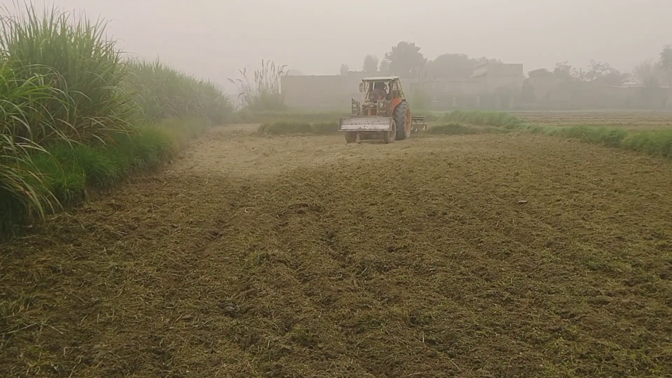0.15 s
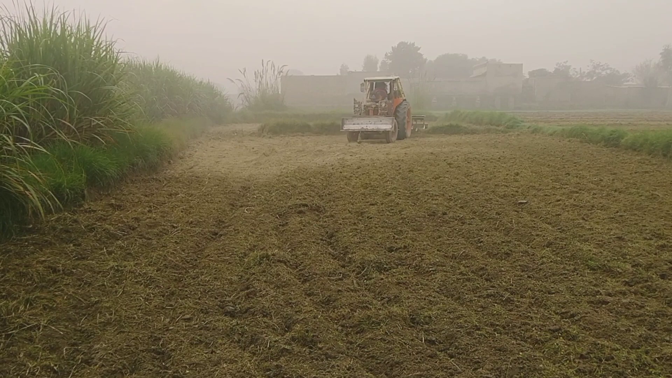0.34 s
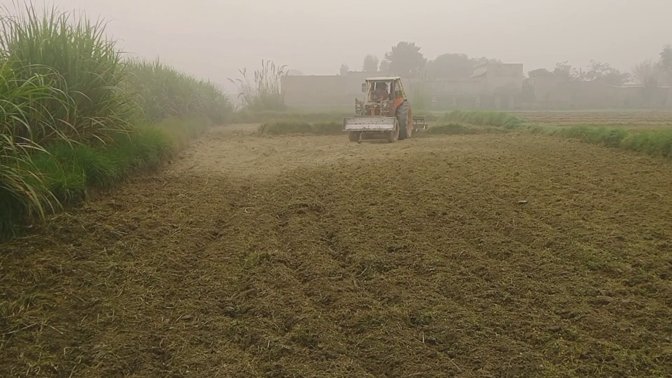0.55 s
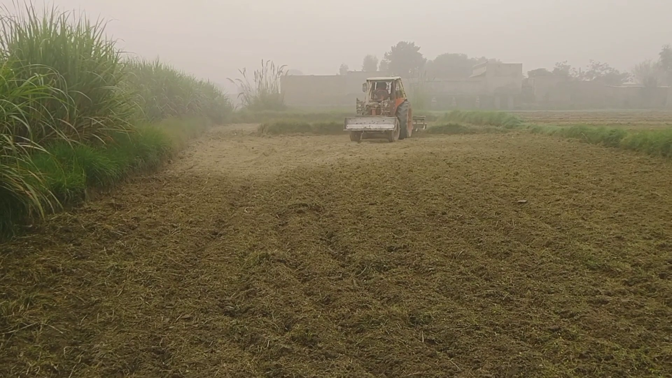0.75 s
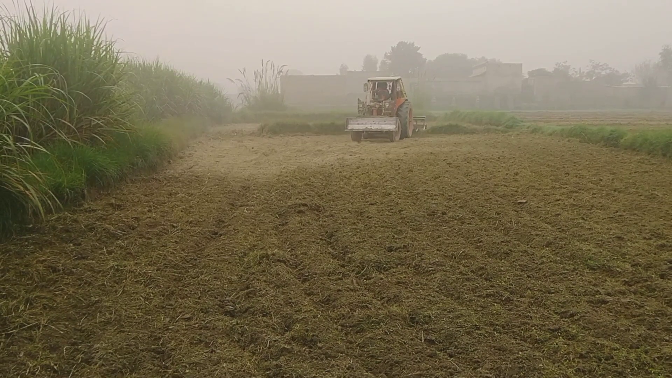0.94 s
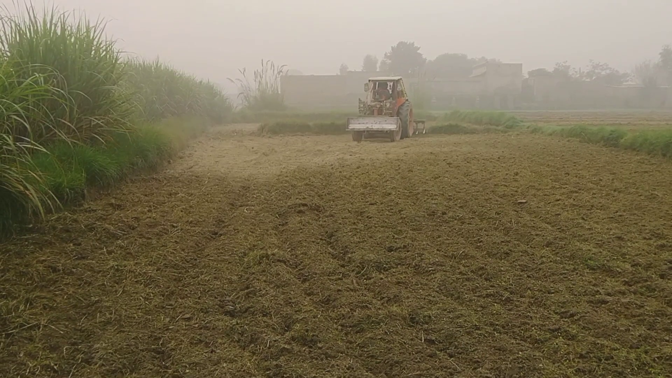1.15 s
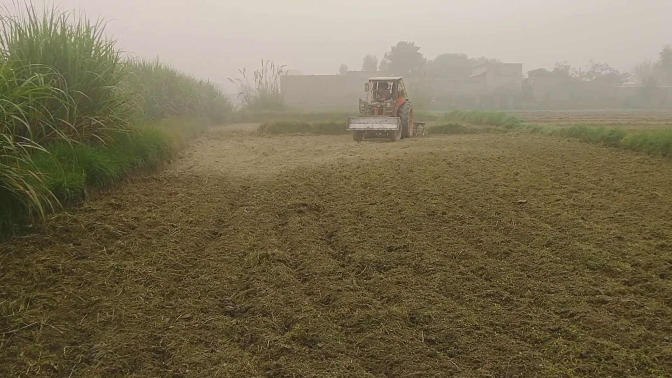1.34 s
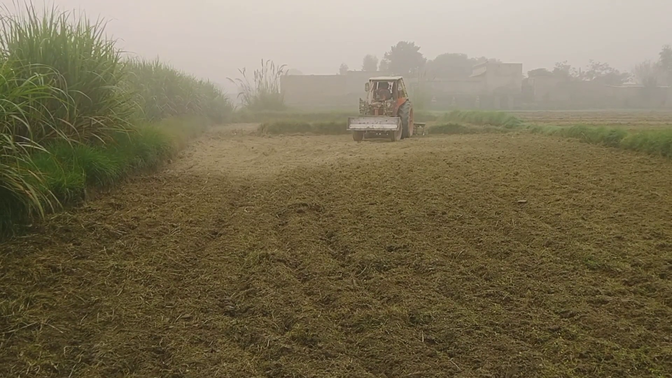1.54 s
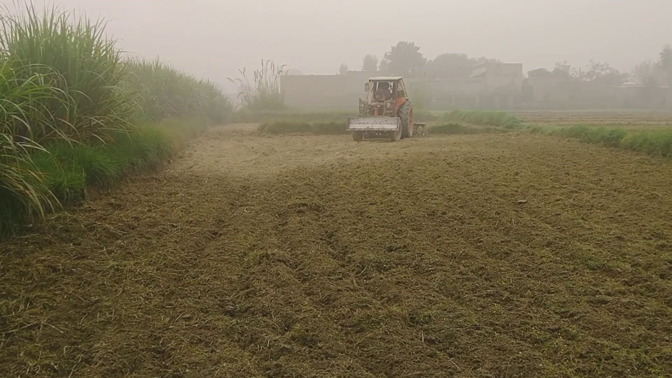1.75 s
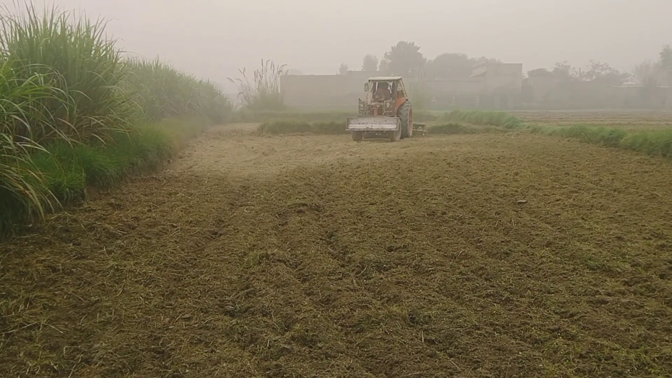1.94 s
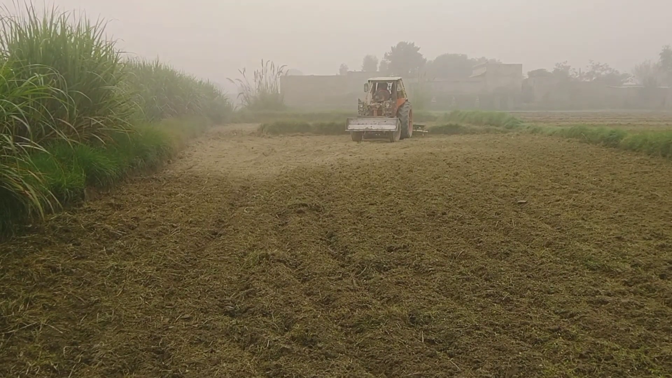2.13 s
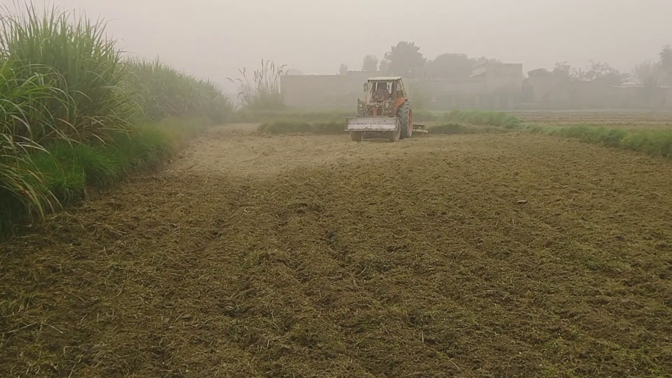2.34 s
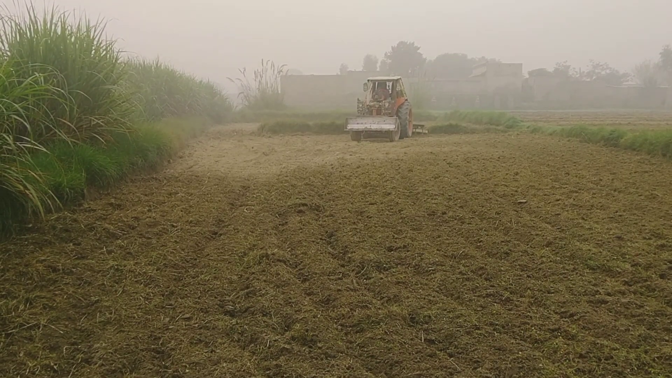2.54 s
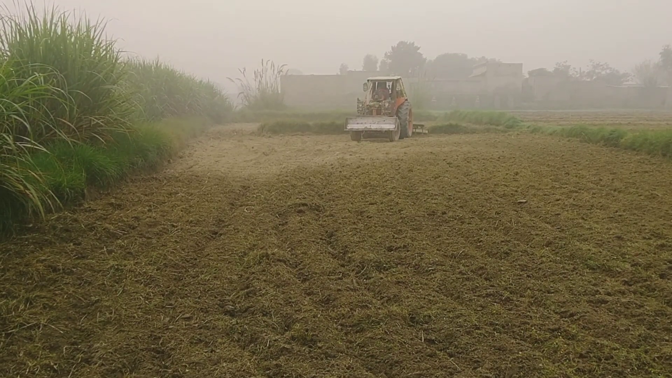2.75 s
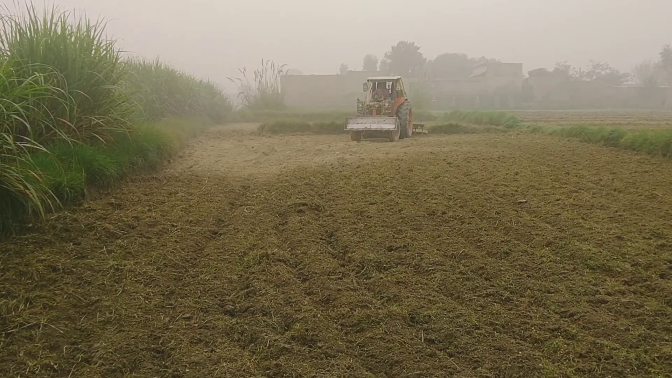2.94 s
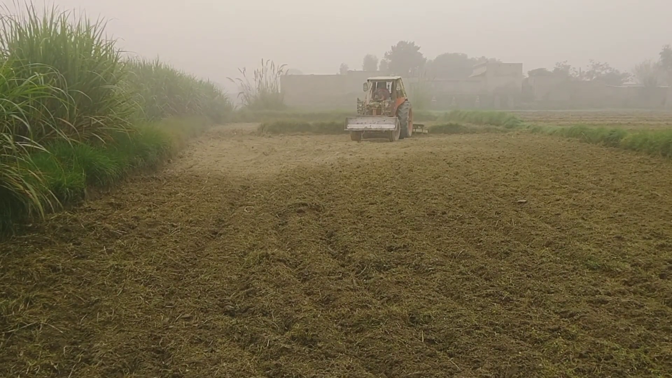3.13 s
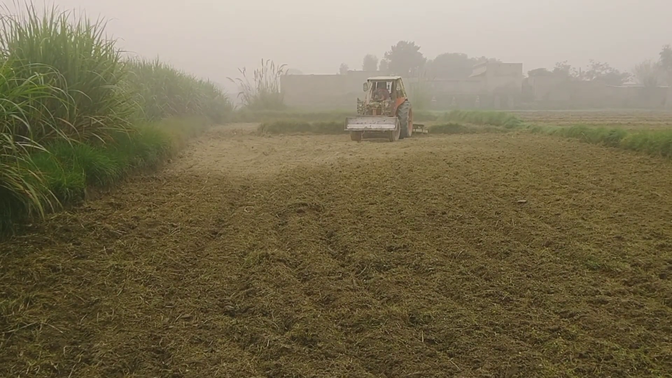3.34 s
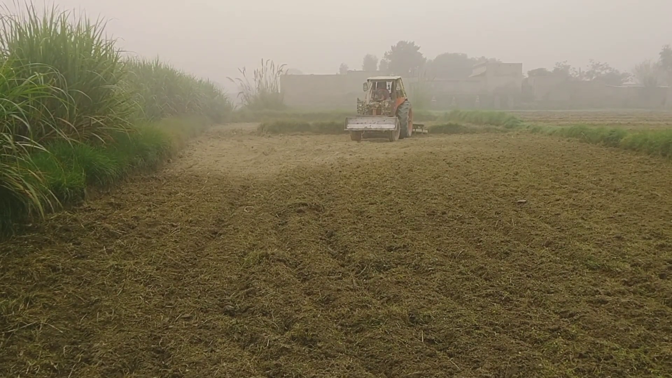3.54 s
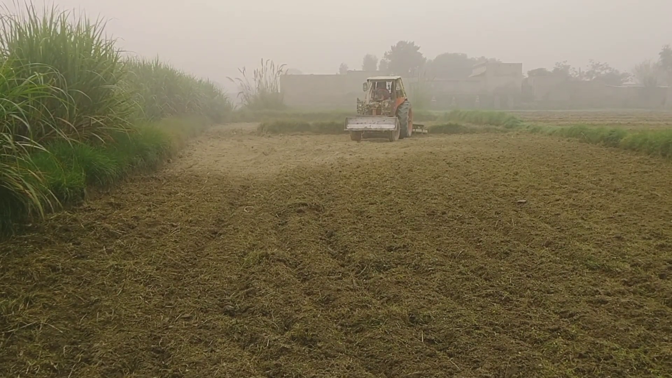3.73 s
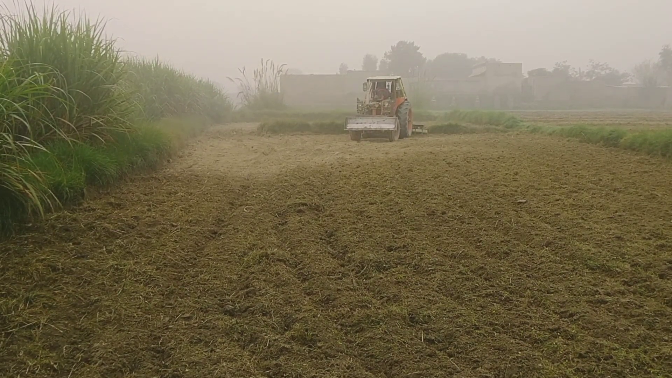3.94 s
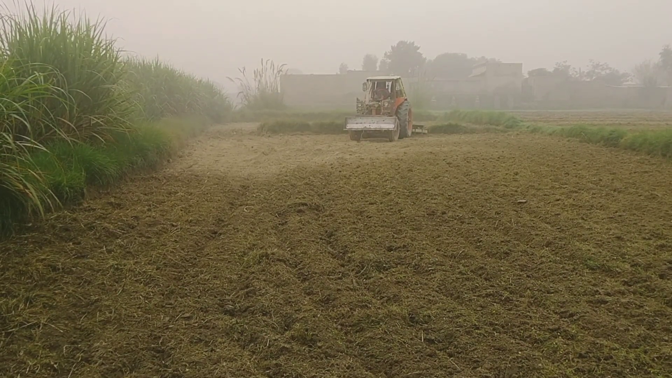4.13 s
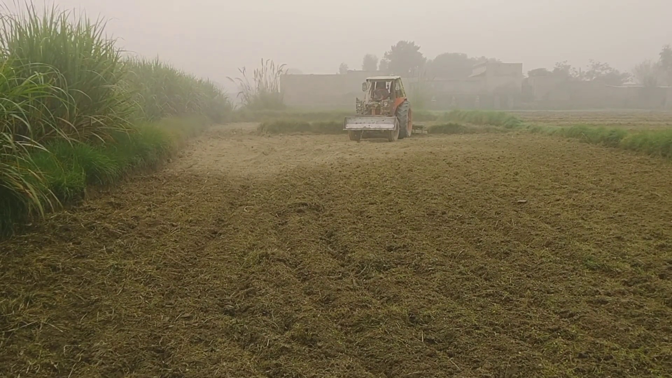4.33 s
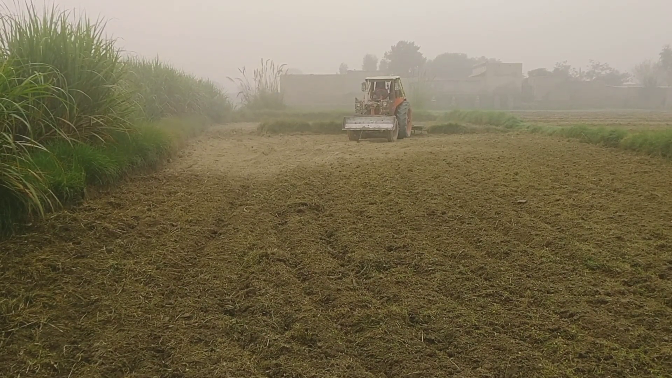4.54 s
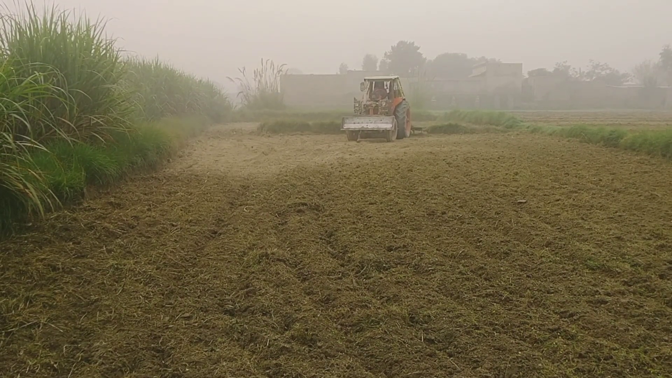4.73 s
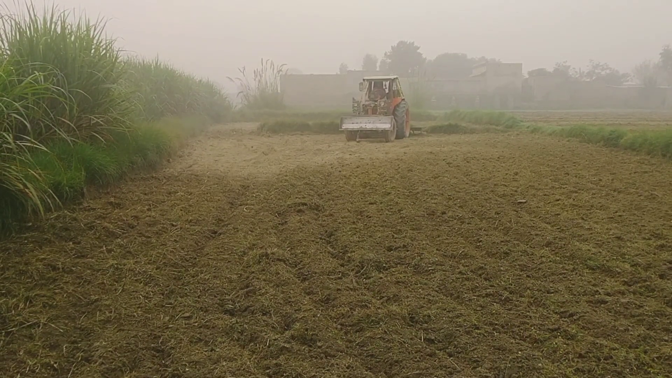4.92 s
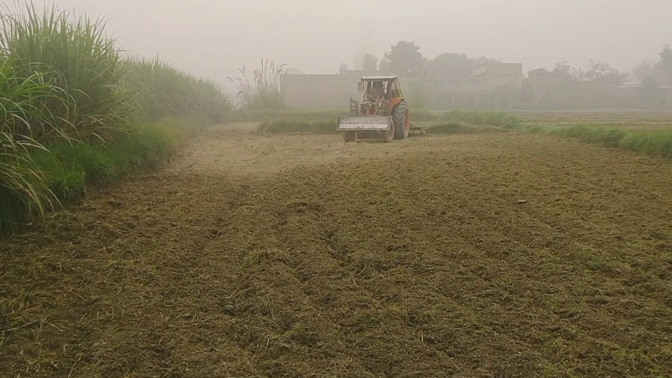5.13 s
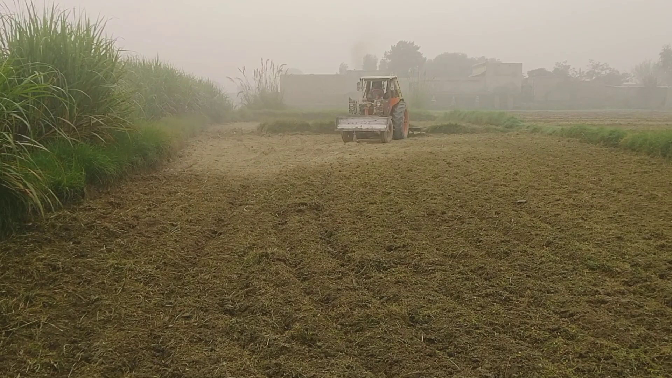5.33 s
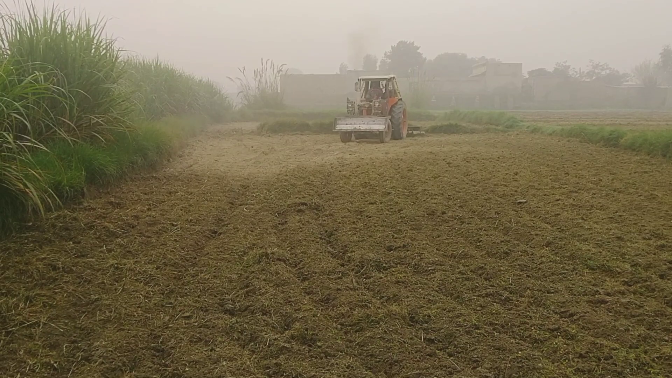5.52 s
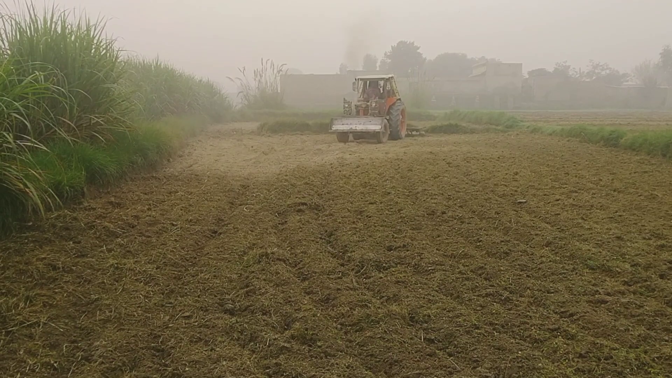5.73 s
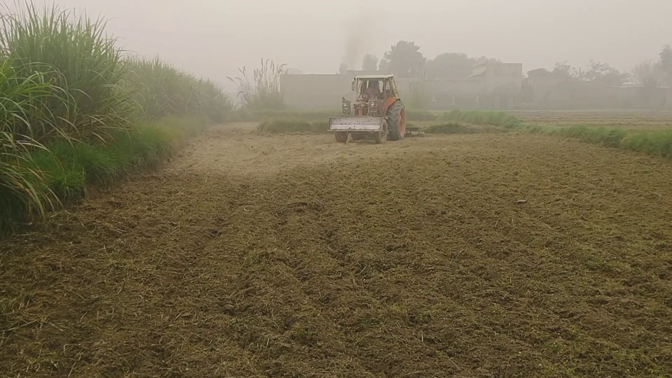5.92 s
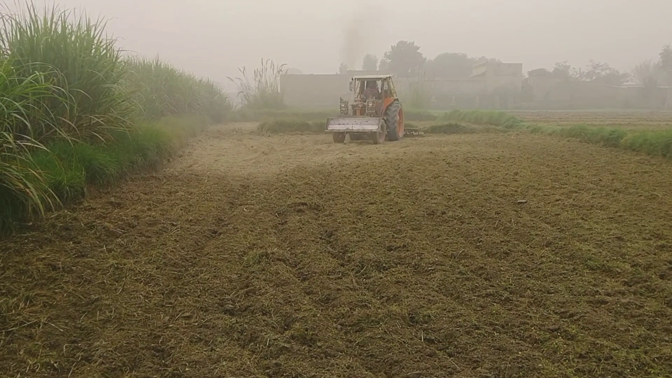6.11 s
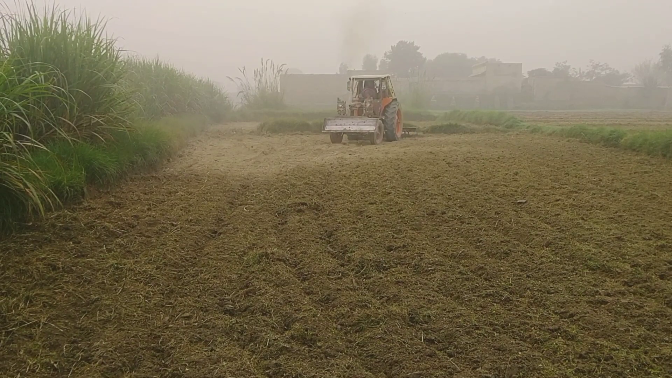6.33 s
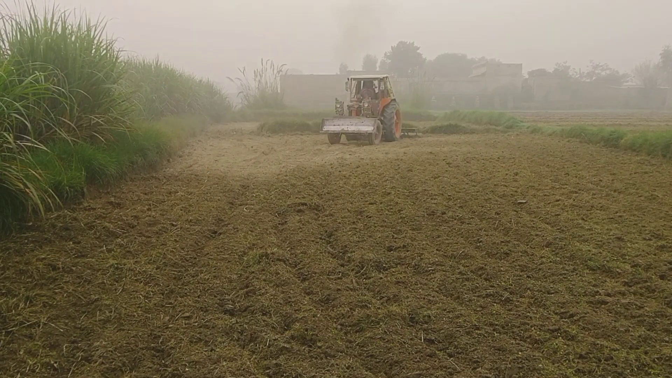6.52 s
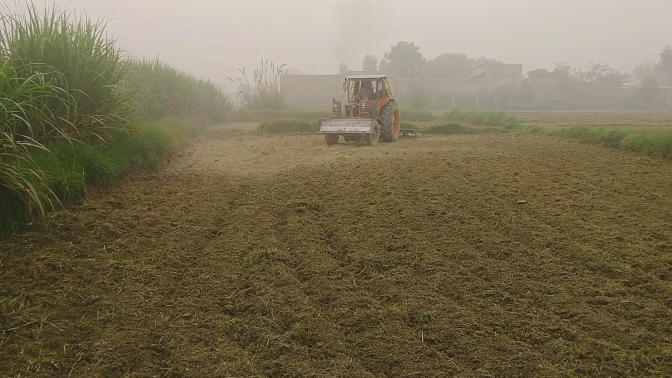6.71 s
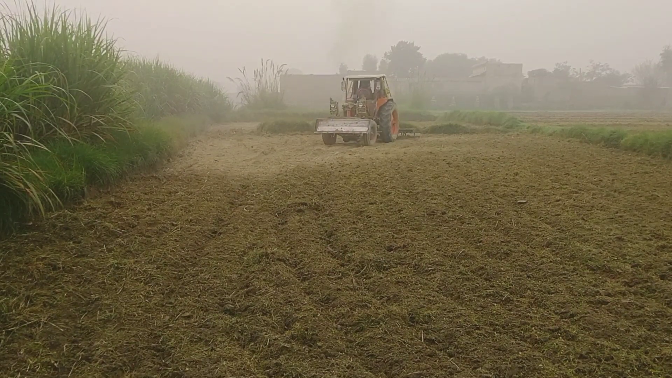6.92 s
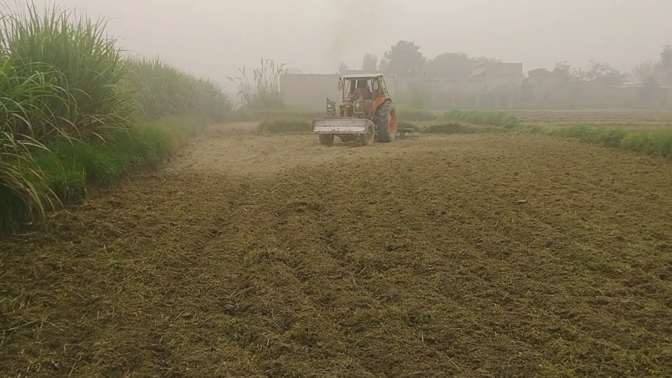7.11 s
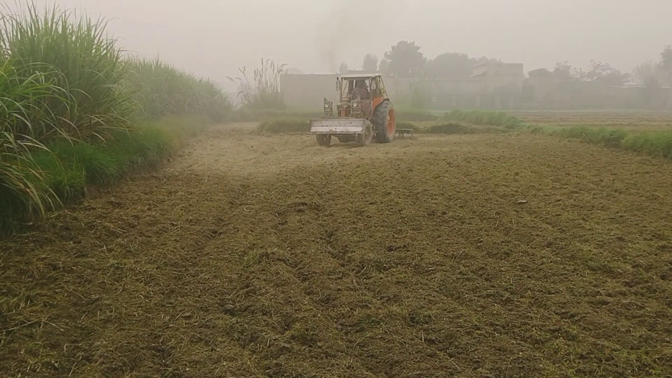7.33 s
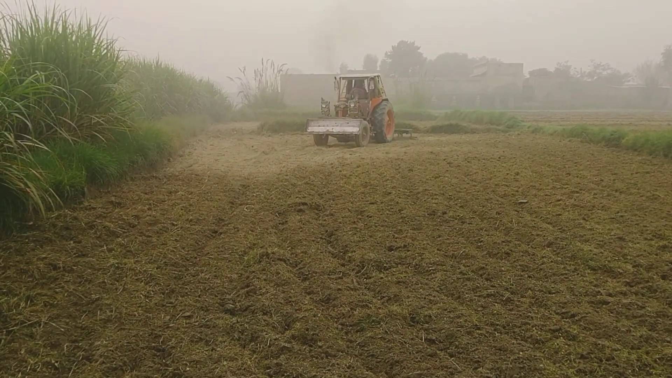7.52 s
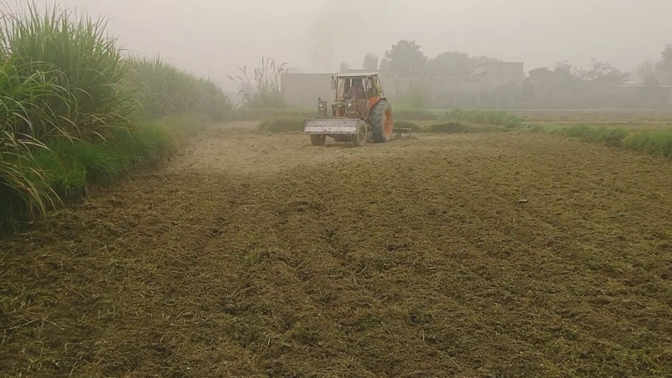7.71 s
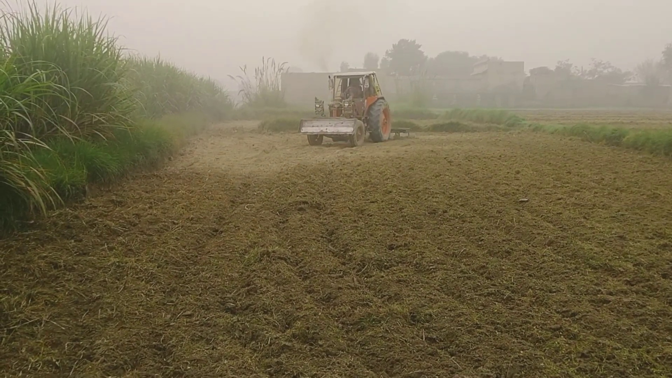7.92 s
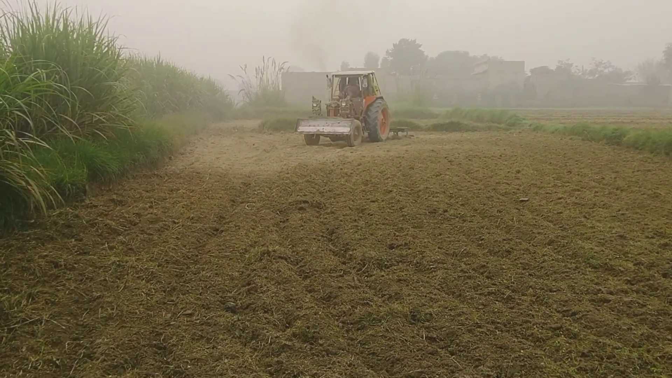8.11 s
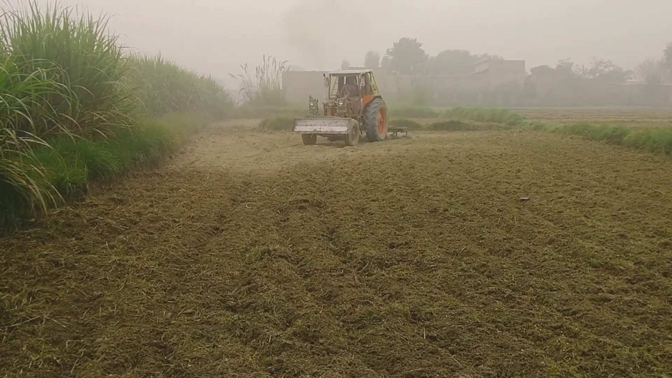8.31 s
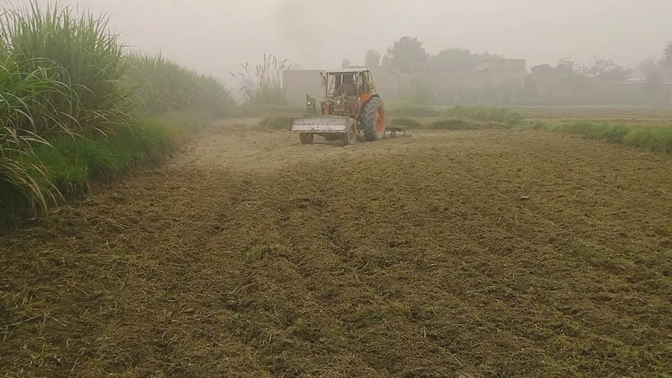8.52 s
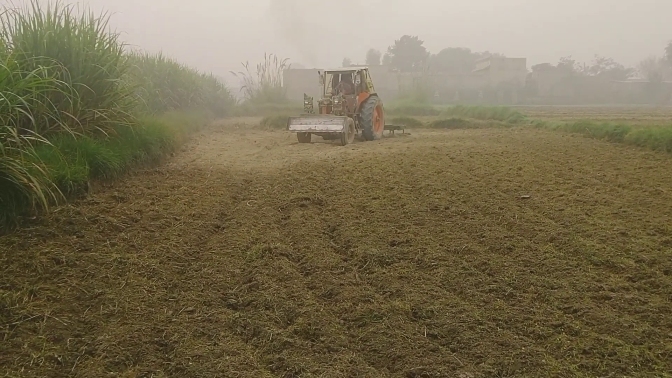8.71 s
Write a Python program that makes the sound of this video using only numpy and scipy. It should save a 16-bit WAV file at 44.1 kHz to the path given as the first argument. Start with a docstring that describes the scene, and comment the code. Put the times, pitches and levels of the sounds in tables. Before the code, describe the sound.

A tractor's diesel engine slows to a soft, lumpy idle, then speeds up into a loud, rapid clatter with puffing exhaust.

```python
"""A four-cylinder diesel tractor idles across a field, heard with little bass and no high treble.
Each firing knocks the engine block and puffs down the exhaust pipe, over a whirr and a faint hum;
the first two cylinders to fire hit hardest. By 2 s the engine has slowed and the hum is fading.
At 3.7 s it takes load and grows much louder, then revs up to about 1200 turns a minute and pulls away."""
import sys
import numpy as np
from scipy import signal
from scipy.fft import rfft, irfft, next_fast_len
from scipy.io import wavfile
from scipy.ndimage import uniform_filter1d

SR = 44100
rng = np.random.default_rng(int(sys.argv[2]) if len(sys.argv) > 2 else 0)


def waveform_to_disk(signal):
    """Save audio, clipped to [-1, 1], as 16-bit WAV at the path in sys.argv[1]."""
    frames = np.transpose(np.atleast_2d(signal))
    scaled = np.clip(frames, -1, 1) * 32767
    samples = np.round(scaled).astype(np.int16)
    wavfile.write(sys.argv[1], SR, samples)


N = 386316
CYLINDERS, FIRING_SAMPLES = 4, 4096


def amp(db):
    """Turns decibels into a gain."""
    return 10 ** (np.asarray(db) / 20)


def unit(x):
    """Scales each row to an average power of 1."""
    return x / np.sqrt(np.mean(np.abs(x) ** 2, axis=-1, keepdims=True) + 1e-30)


def along(points, hz):
    """Reads a table of frequencies and levels on a log axis."""
    f, db = np.transpose(points)
    return np.interp(np.log(hz + 1), np.log(f + 1), db)


def curves(rows, at):
    """Reads each column after the time at the given seconds."""
    times, *columns = np.transpose(rows)
    return [np.interp(at, times, column) for column in columns]


def coloured(x, points):
    """Shapes the tone with a filter that rings only after each sound, never before."""
    m = next_fast_len(N + SR) // 2 * 2
    cepstrum = irfft(np.log(amp(along(points, np.fft.rfftfreq(m, 1 / SR))) + 1e-6), m)
    cepstrum[1:m // 2] *= 2
    cepstrum[m // 2 + 1:] = 0
    return irfft(rfft(x, m) * np.exp(rfft(cepstrum)), m)[:N]


def resonance(hz, centre, width):
    """One ringing tone: a band filter applied three times for steep sides."""
    return (1j * hz * width / (centre ** 2 - hz ** 2 + 1j * hz * width)) ** 3


# how hard the engine works: t/s, share of full load/0-1
LOAD = [(3.7, 0), (4.15, 1)]

def load_at(times):
    """Gives 0 at idle and 1 at full load."""
    return curves(LOAD, times)[0]


# crank speed: t/s, speed/turns per minute
CRANK_SPEED = [(-0.07, 813.7), (0.3, 788.6), (0.6, 685.0), (1.9, 518.1), (3.15, 587.2), (3.45, 575.3),
               (3.8, 577.3), (3.9, 688.9), (4.4, 842.9), (4.9, 822.4), (5.3, 960.4), (5.55, 962.9),
               (6.05, 1107.6), (6.3, 1057.4), (6.8, 1121.4), (6.9, 1041.0), (7.05, 1103.2), (7.2, 1051.3),
               (7.55, 1203.4), (7.8, 1163.5), (8.2, 1216.3), (8.77, 1211.9)]
# how late each cylinder gets its fuel: delay/firing intervals
FUEL_DELAY = [0.00385, -.01, .02, .02]

def firings():
    """Each cylinder fires once in two turns of the crank; gives the times and cylinders (0-3)."""
    at = np.arange(CRANK_SPEED[0][0], CRANK_SPEED[-1][0], 1 / SR)
    cycles = np.cumsum(curves(CRANK_SPEED, at)[0]) / (60 * 2 * SR)
    count = np.arange(int(cycles[-1] * CYLINDERS))
    cylinder = count % CYLINDERS
    due = (count + np.array(FUEL_DELAY)[cylinder]) / CYLINDERS
    return np.interp(due, cycles, at), cylinder


def burn(cylinder, load, lead):
    """Burning fuel makes a rough burst of pressure, starting after `lead` samples."""
    t = np.maximum(np.arange(FIRING_SAMPLES) - lead, 0) / SR
    rise_s = np.where(cylinder < 2, .004, .008 - .0045 * load)[:, None]  # weak idle firings burn slowly
    fade_s = (.055 - .029 * load)[:, None]
    shape = (1 - np.exp(-(t / rise_s) ** 2)) * (amp(-60 * t / fade_s) + .081 * amp(-60 * t / .13))
    return shape * rng.standard_normal(shape.shape)


# ringing tones of block and bonnet: idle f/Hz, loaded f/Hz, width/Hz
BLOCK_TONES = [(373, 402, 131), (638, 630, 226), (829, 937, 187), (1260, 1310, 250), (1566, 1727, 460),
               (1880, 2060, 270), (2418, 2356, 440), (2864, 3165, 560), (3550, 3587, 536),
               (4190, 4050, 320), (4820, 4700, 780), (5510, 5580, 800), (6580, 6370, 750)]
# how hard each tone is struck: cylinder 1 level/dB, 2 level/dB, 3 and 4 level/dB, load change/dB
STRIKES = [(-21, -13, -10, -1), (-26, -19.5, -17, 8), (6.5, -6, 4.5, -6.5), (-8, -13, -5.5, -10.5),
           (-5.5, -5, 7, -4.5), (-3.5, -10, 0, 5), (3, -1.5, 2, 0), (1, -9, -4, 1), (3, -6.5, -6, 6),
           (-27, -19, -9, -6.5), (-34.5, -20.5, -19.5, -4.5), (-14.5, -8, -7, -4.5),
           (-27.5, -18, -17, -0.5)]
# cylinders 3 and 4 favour two tones under load; for each tone: boost/dB
PING = [-1, 1.5, -0.5, -1, -5, -4, 3.5, -2.5, 4, 0.5, -1, -0.5, 1]
# the knock: t/s, cylinder 1 level/dB, 2 level/dB, 3 and 4 level/dB,
# boost of 1's bright rap/dB, boost of 1 and 2's low thud under load/dB
KNOCK_LEVELS = [(0, -45.5, -47.5, -60, -9, 0), (.5, -54, -51.5, -61, -17, 0),
                (1.7, -50.5, -56, -57, -6.5, 0), (2.1, -47.5, -46.5, -58.5, -7.5, 0),
                (2.7, -43, -44.5, -56.5, -12.5, 0), (3.05, -40.5, -39.5, -59, -12, 0),
                (3.25, -52, -52, -58, -17, 0), (3.66, -43, -45, -57.5, -9, 3),
                (3.84, -28.5, -27.5, -53, -11, -7), (4.5, -22.5, -26, -41, -4.5, -1),
                (5, -17.5, -23, -30.5, -5, -1), (5.4, -21, -25.5, -28, -2, 2), (5.8, -23, -26, -30.5, 4, 4),
                (6, -28, -32, -39.5, -2.5, 8), (6.6, -23.5, -27, -37.5, 2, 1),
                (7, -24, -33, -37.5, -2.5, 6), (7.3, -20, -25.5, -31.5, 5.5, 5.5),
                (7.65, -23, -29.5, -34, 8.5, 7), (8.4, -24.5, -31, -36.5, 0, 7),
                (8.76, -23.5, -26, -38, -10.5, 3)]
# firings harder or weaker than usual: t/s, change in level/dB
STANDOUTS = [(.383, 11), (.723, 16.5), (.768, 7), (2.823, -0.5), (3.702, 3), (4.3, 2.5), (4.625, 0),
             (4.733, 1), (4.768, -6.5), (5.44, 0), (5.687, -2), (1.497, 3), (5.565, 2.5), (5.918, 3.5),
             (6.029, -1), (6.138, 1.5), (6.585, 2.5), (6.721, -3), (6.801, -4), (7.248, 1.5), (7.766, -5.5),
             (7.87, 3.5), (7.97, -2), (8.071, 2.5), (8.172, -6), (8.565, 1.5)]

def knock(times, cylinder):
    """Each burst of pressure rings the engine block, mixing its tones a little differently."""
    load = load_at(times)
    first_db, second_db, weak_db, rap_db, thud_db = curves(KNOCK_LEVELS, times)
    extra_db, rap_scatter_db = (rng.standard_normal((len(times), 2)) * [1.5, 3]).T
    for when, db in STANDOUTS:
        extra_db[np.argmin(abs(times - when))] = db
    level_db = np.choose(cylinder, [first_db, second_db, weak_db, weak_db]) + extra_db
    # cylinder 1's hollow ring keeps its own level and only partly follows a harder knock
    follows = np.interp(load, [0, 1], [.41, .1])
    hollow_db = np.interp(load, [0, 1], [-48, -35.5]) + follows * extra_db - level_db
    lead = FIRING_SAMPLES // 16  # room for the early thump
    hz = np.fft.rfftfreq(FIRING_SAMPLES, 1 / SR)
    burst = rfft(burn(cylinder, load, lead))
    scatter_db, detune = (rng.standard_normal((len(times), len(STRIKES), 2)) * [2.5, .018]).T
    ringing = 0
    for k, (idle_hz, load_hz, width) in enumerate(BLOCK_TONES):
        first, second, weak, change = STRIKES[k]
        bright, hollow = 2800 < idle_hz < 4300, 700 < idle_hz < 1100
        first_boost = rap_db + rap_scatter_db if bright else hollow_db if hollow else change * load
        others_db = np.where(cylinder == 1, second, weak + PING[k] * load) + change * load
        db = np.where(cylinder == 0, first + first_boost, others_db) + scatter_db[k]
        if idle_hz < 1700 and not hollow:  # the low thud hardly follows a harder knock
            db += load * (thud_db - 1.2 * extra_db) * (cylinder < 2)
        early = np.exp(2j * np.pi * hz * .005 * (idle_hz < 700))  # the deepest tones thump 5 ms early
        centre = (idle_hz + (load_hz - idle_hz) * load) * (1 + detune[k])
        ringing += amp(db)[:, None] * unit(burst * resonance(hz, centre[:, None], width) * early)
    # the bright part of the first 16 ms sets each knock's level
    attack = irfft(ringing * ((hz > 1700) & (hz < 4300)))[:, lead:lead + round(.016 * SR)]
    gain = amp(level_db) / np.sqrt(np.mean(attack ** 2, axis=1))
    return lay(irfft(ringing) * gain[:, None], times - .0015 - lead / SR)


def lay(sounds, times):
    """Adds up short sounds that start at the given seconds."""
    at = np.round(times * SR).astype(int)[:, None] + np.arange(sounds.shape[1]) + SR
    return np.bincount(at.ravel(), sounds.ravel(), N + 3 * SR)[SR:SR + N]


def field_echo(x, fade_s=.18):
    """Crops and ground scatter the sound into a short tail."""
    t = np.arange(SR // 4) / SR
    tail = rng.standard_normal(len(t)) * amp(-60 * t / fade_s) * (t > .005)
    return signal.fftconvolve(x, tail / np.linalg.norm(tail))[:N]


# puff sizes, an idle row and a loaded row: relative level/dB for each cylinder
PUFFS = [(0, 0, -11, -20.5), (0, -2, -3.5, -2)]
# each cylinder's trip to the mouth of the pipe: t/s
PUFF_TRAVEL = [0.0042, 0.0051, .0036, 0.0047]
# tone of the pipe: f/Hz, relative level/dB
PIPE_TONE = [(30, -70), (48, -34.5), (72, -9), (97, 7), (120, -0.5), (152, -4.5), (175, -32.5), (215, -25),
             (400, -50), (2000, -109.5)]
# loudness of the exhaust: t/s, level/dB
EXHAUST_LEVELS = [(0, -59.5), (.8, -61), (1.1, -66), (2.2, -66.5), (3.7, -61.5), (4, -51.5), (5, -49.5),
                  (5.7, -41), (6.05, -51.5), (7, -49.5), (8.76, -50)]

def exhaust(times, cylinder, wake_db=-12):
    """Each firing sends a puff and a wake of swirling gas that ring the pipe."""
    idle_db, load_db = np.array(PUFFS)[:, cylinder]
    scatter_db = 1.2 * rng.standard_normal(len(times))
    size = amp(idle_db + (load_db - idle_db) * load_at(times) + scatter_db)
    t = np.arange(FIRING_SAMPLES) / SR
    wake = rng.standard_normal((len(times), FIRING_SAMPLES)) * amp(-60 * t / .2)
    puffs = amp(wake_db) * unit(wake) / np.sqrt(FIRING_SAMPLES)
    puffs[:, 0] = 1  # the sharp puff itself
    arrivals = times + np.array(PUFF_TRAVEL)[cylinder]
    pipe = coloured(lay(size[:, None] * puffs, arrivals), PIPE_TONE)
    slow_power = uniform_filter1d(uniform_filter1d(pipe ** 2, SR // 4), SR // 4)
    level_db, = curves(EXHAUST_LEVELS, np.arange(N) / SR)
    return amp(level_db) * pipe / np.sqrt(np.abs(slow_power))


# loudness of the moving parts: t/s, level/dB
WHIRR_LEVELS = [(0, -53), (1.2, -59.5), (3.6, -60.5), (4.5, -49), (5.6, -43), (6.2, -46.5), (7.3, -42.5),
                (8.76, -43)]
# tone of wheels and frame: f/Hz, relative level/dB
RUMBLE_TONE = [(40, -41), (130, -24), (220, -9), (400, -10), (510, -16.5), (700, -5), (1000, -5),
               (4500, -23.5), (8000, -34)]

def moving_parts():
    """Fan, gears and valves blur into a whirr in the block's tones, over the rumble of the frame."""
    t, hz = np.arange(N) / SR, np.fft.rfftfreq(N, 1 / SR)
    load = load_at(t)
    noise = rfft(rng.standard_normal(N))
    idle = loaded = 0
    for (idle_hz, load_hz, width), (_, _, db, change) in zip(BLOCK_TONES, STRIKES):
        idle += amp(db) * unit(resonance(hz, idle_hz, width))
        loaded += amp(db + change) * unit(resonance(hz, load_hz, width))
    whirr = (1 - load) * unit(irfft(noise * idle, N)) + load * unit(irfft(noise * loaded, N))
    rumble = amp(1.5 - 1.2 * load) * unit(coloured(rng.standard_normal(N), RUMBLE_TONE))
    return amp(curves(WHIRR_LEVELS, t)[0]) * (whirr + rumble)


# loudness of the hum: t/s, level/dB
HUM_LEVELS = [(0, -70), (1.7, -72), (2.3, -84), (8.76, -86)]

def hum(pitch_hz=222, width_hz=48):
    """A faint, wavering low tone that fades once the idle has slowed."""
    tone = rfft(rng.standard_normal(N)) * resonance(np.fft.rfftfreq(N, 1 / SR), pitch_hz, width_hz)
    return amp(curves(HUM_LEVELS, np.arange(N) / SR)[0]) * unit(irfft(tone, N))


def scene():
    """Mixes the tractor into one channel; knock and exhaust share the same firings."""
    times, cylinder = firings()
    block = knock(times, cylinder)
    echo = amp(-15) * field_echo(block)
    return (block + echo + exhaust(times, cylinder) + moving_parts() + hum())[None]


# what the microphone lets through: f/Hz, level/dB
TREBLE_LOSS = [(6600, -1), (7200, -6.5), (8000, -19)]

def record(dry, top_hz=8000):
    """A small microphone dulls the treble and hears nothing above top_hz."""
    m = next_fast_len(N + SR)
    hz = np.fft.rfftfreq(m, 1 / SR)
    return irfft(rfft(dry, m) * amp(along(TREBLE_LOSS, hz)) * (hz < top_hz), m)[:, :N]


dry = scene()
out = record(dry)
waveform_to_disk(out)
```